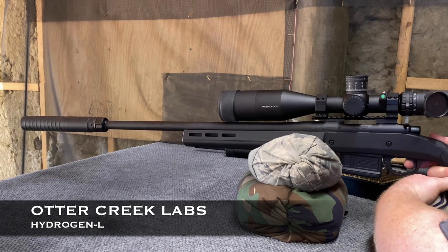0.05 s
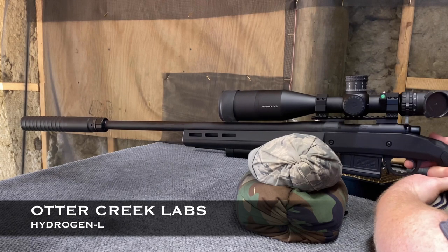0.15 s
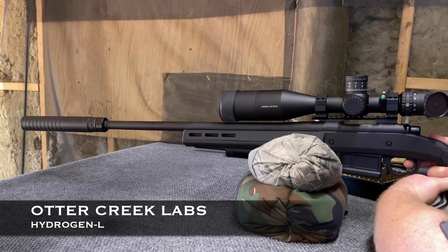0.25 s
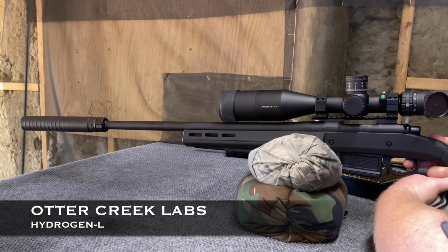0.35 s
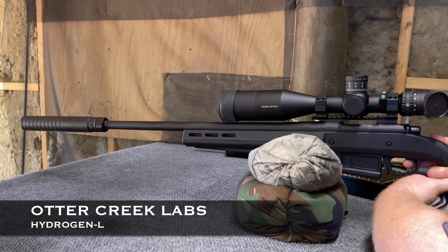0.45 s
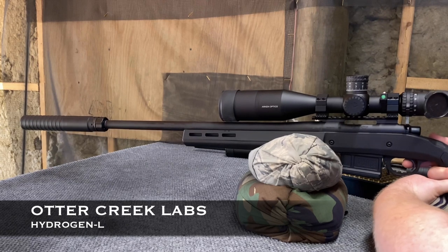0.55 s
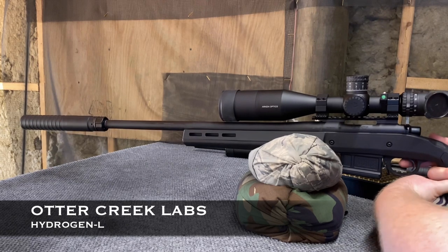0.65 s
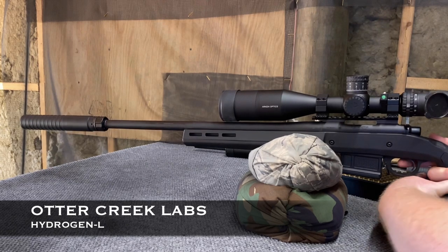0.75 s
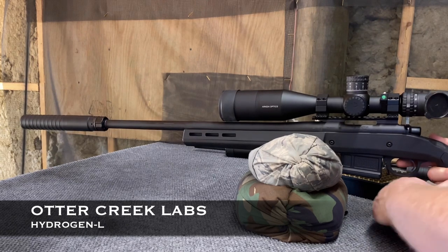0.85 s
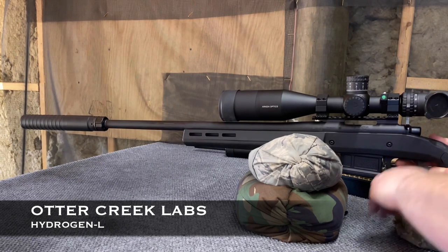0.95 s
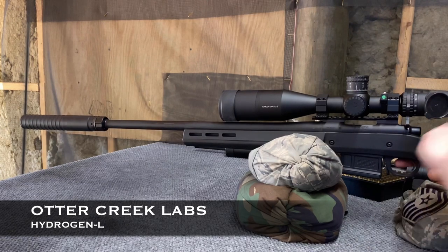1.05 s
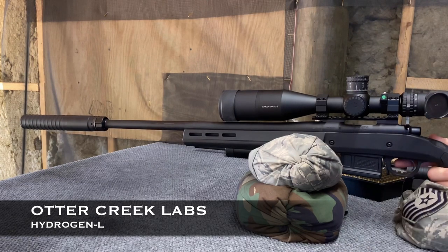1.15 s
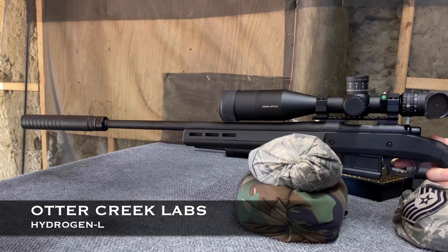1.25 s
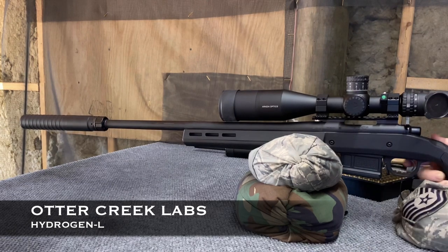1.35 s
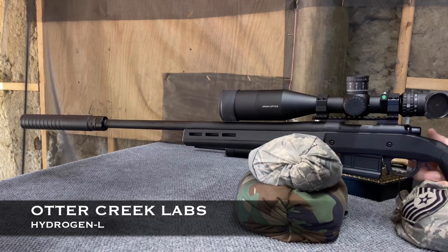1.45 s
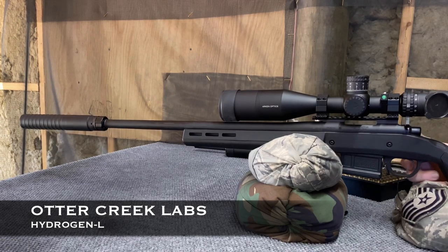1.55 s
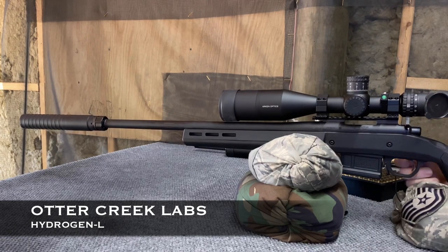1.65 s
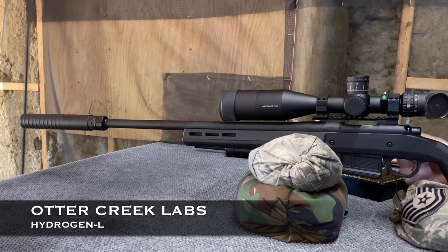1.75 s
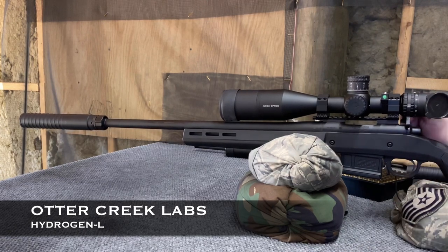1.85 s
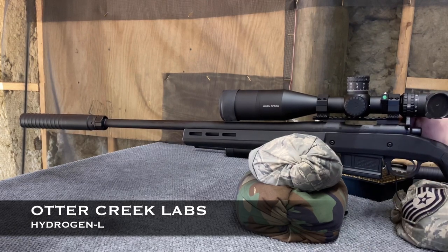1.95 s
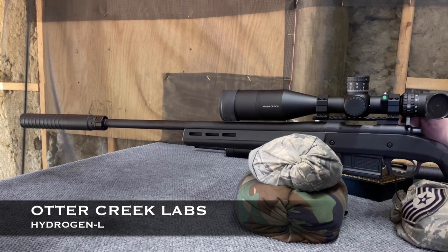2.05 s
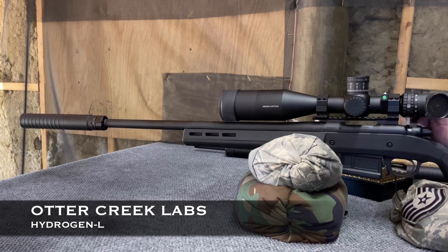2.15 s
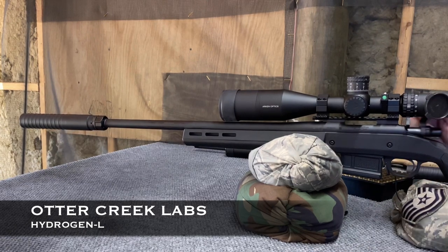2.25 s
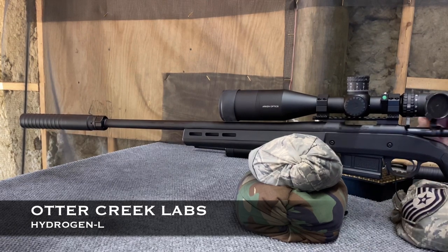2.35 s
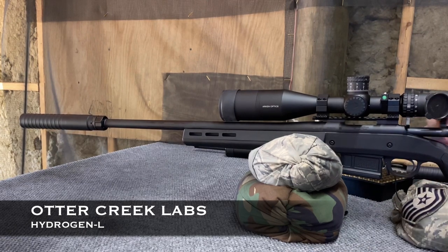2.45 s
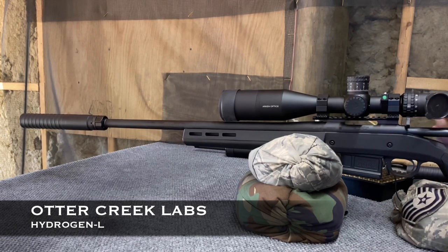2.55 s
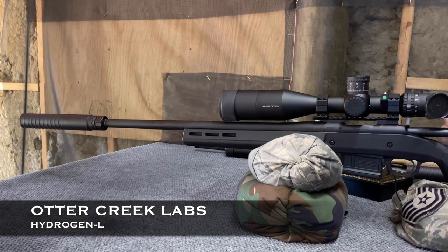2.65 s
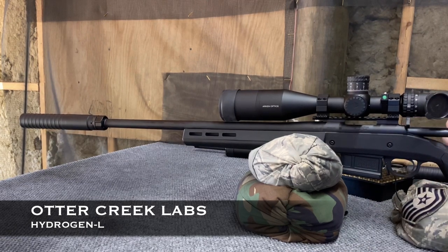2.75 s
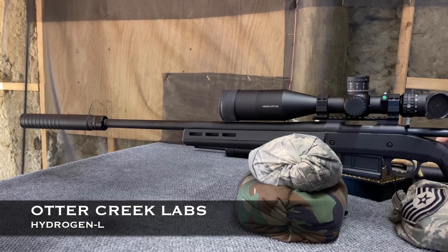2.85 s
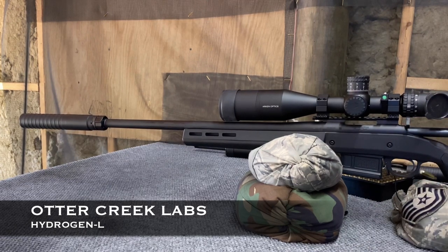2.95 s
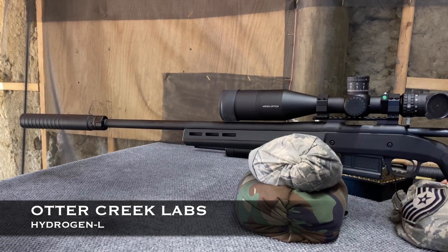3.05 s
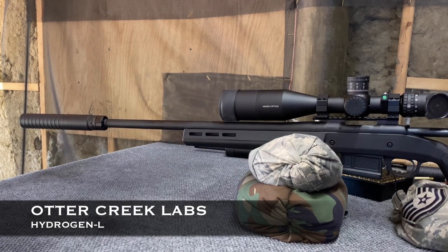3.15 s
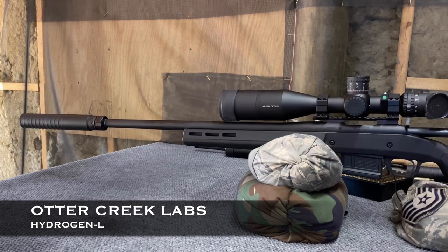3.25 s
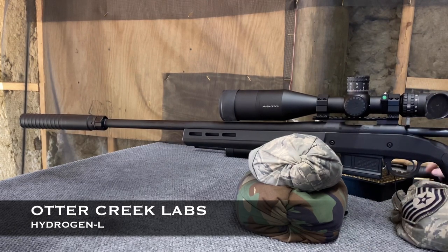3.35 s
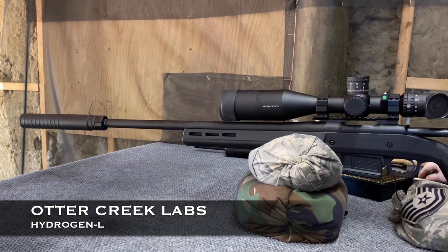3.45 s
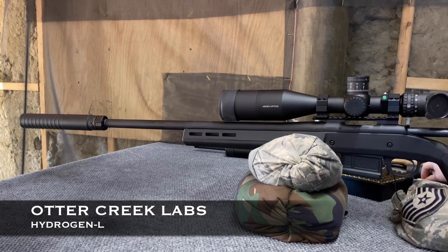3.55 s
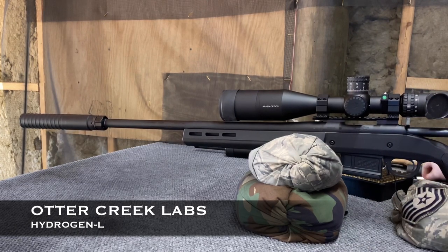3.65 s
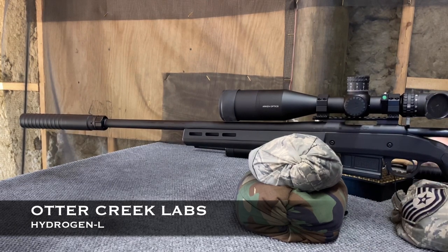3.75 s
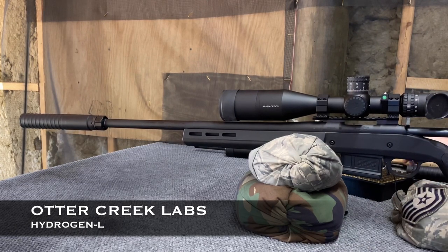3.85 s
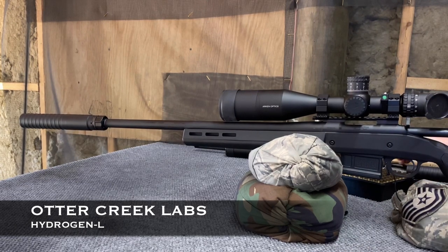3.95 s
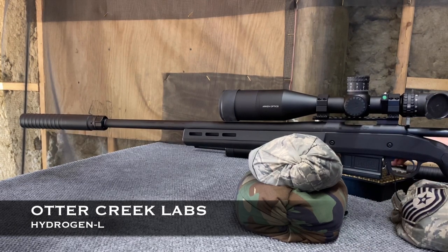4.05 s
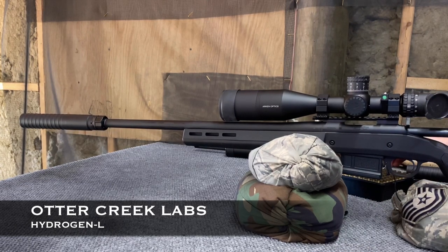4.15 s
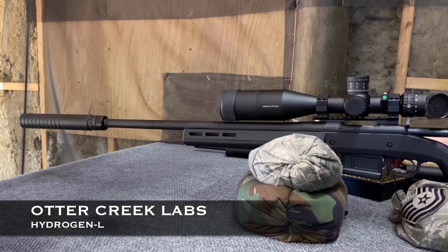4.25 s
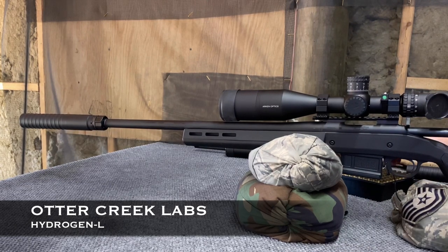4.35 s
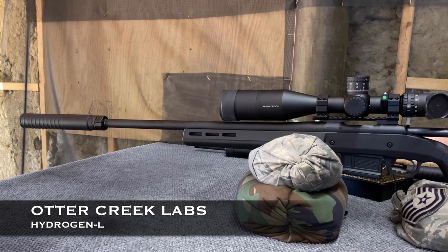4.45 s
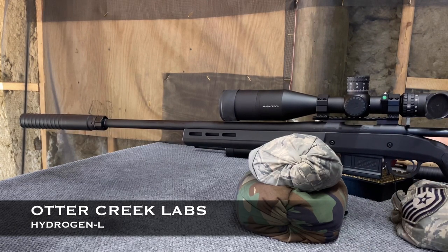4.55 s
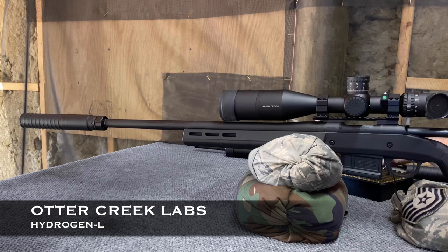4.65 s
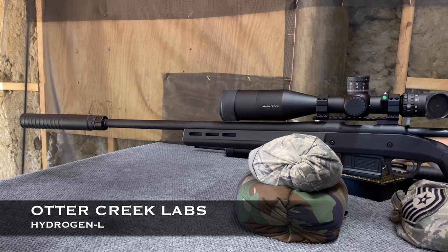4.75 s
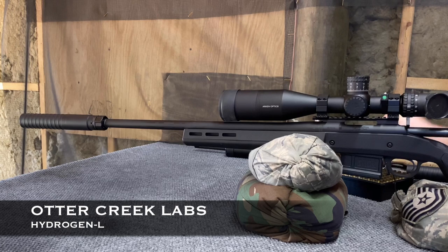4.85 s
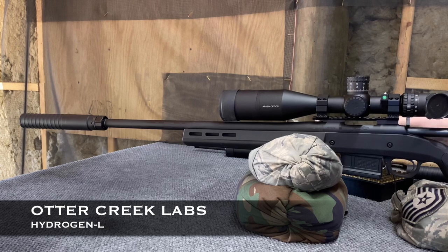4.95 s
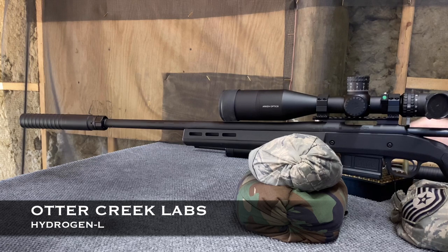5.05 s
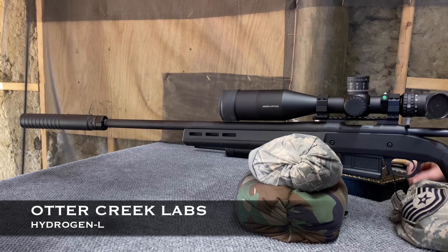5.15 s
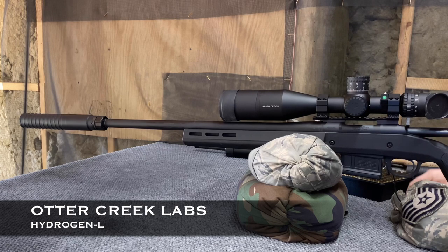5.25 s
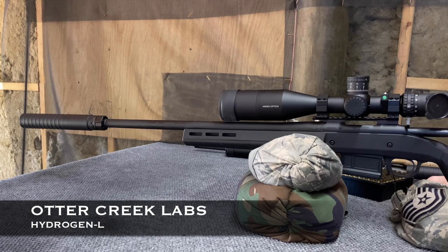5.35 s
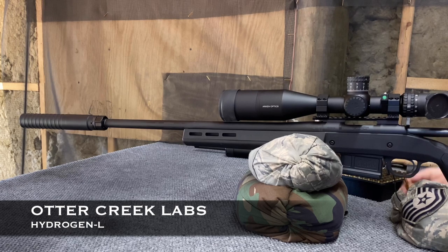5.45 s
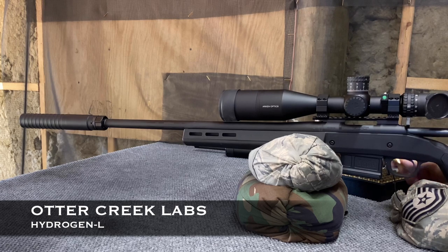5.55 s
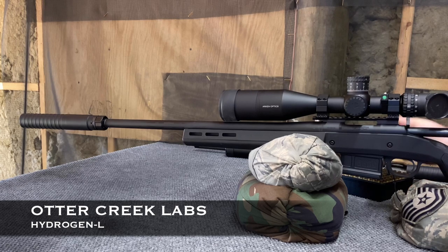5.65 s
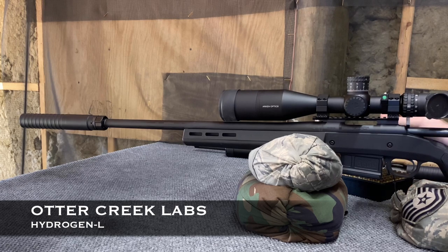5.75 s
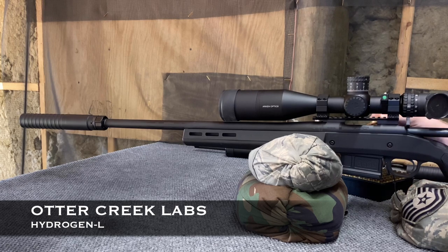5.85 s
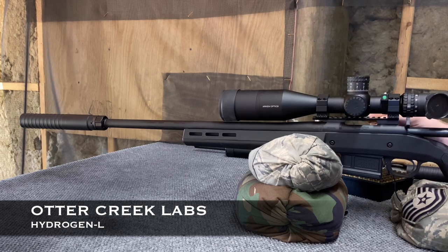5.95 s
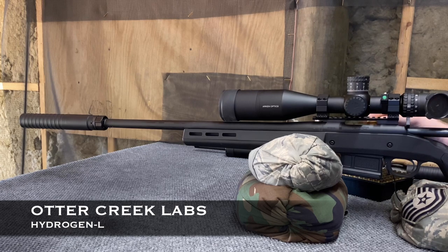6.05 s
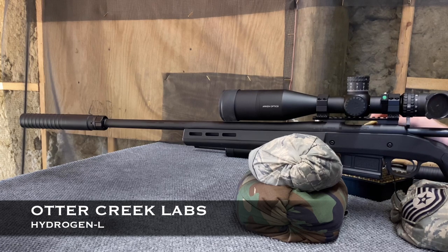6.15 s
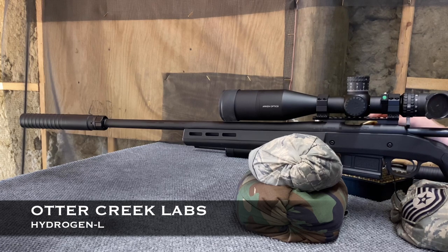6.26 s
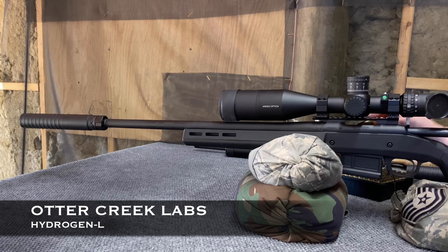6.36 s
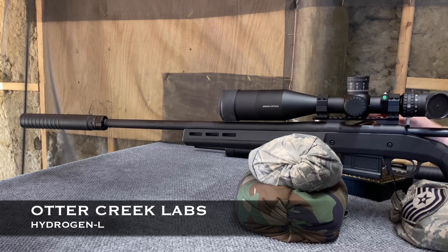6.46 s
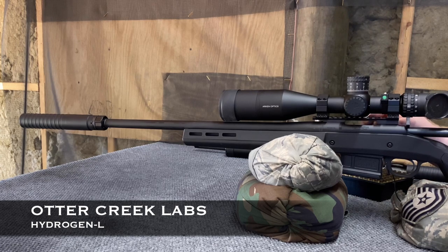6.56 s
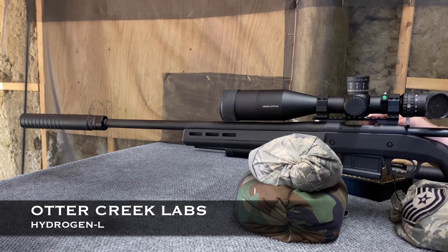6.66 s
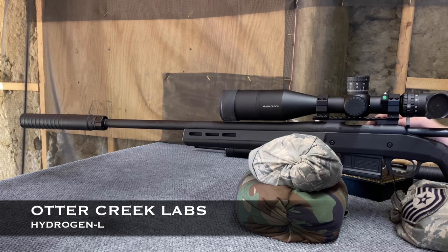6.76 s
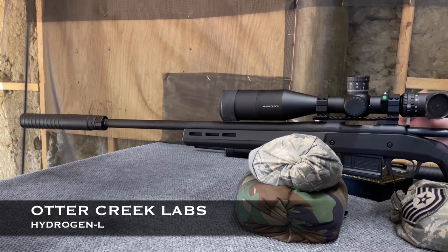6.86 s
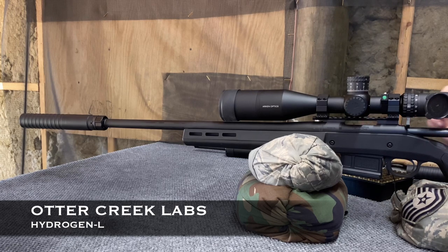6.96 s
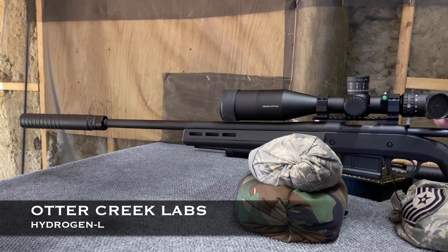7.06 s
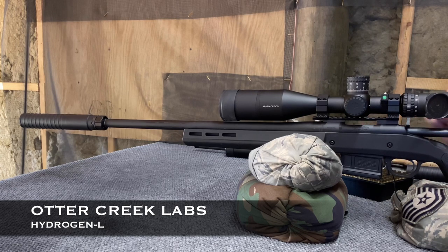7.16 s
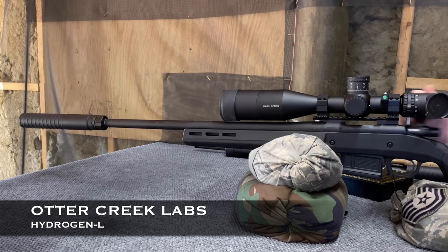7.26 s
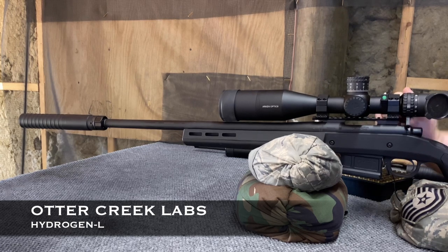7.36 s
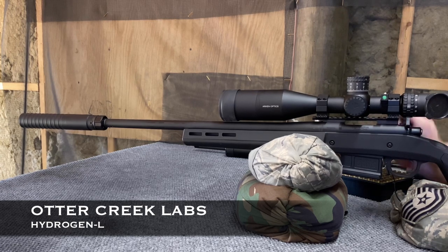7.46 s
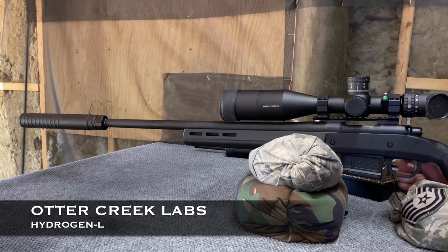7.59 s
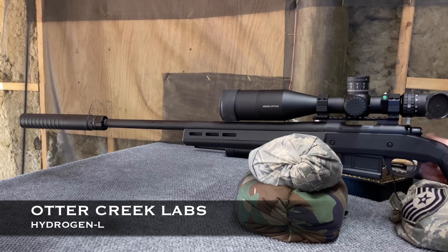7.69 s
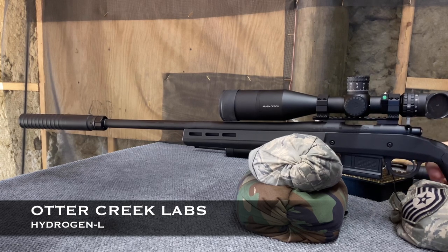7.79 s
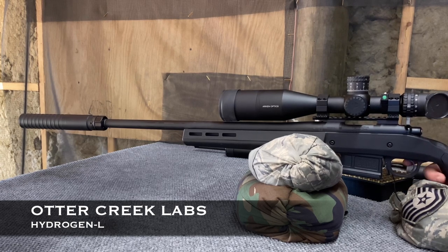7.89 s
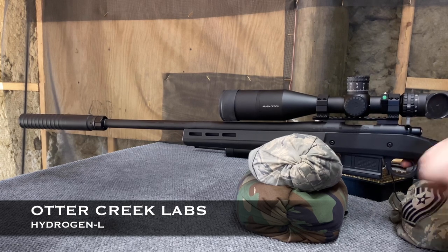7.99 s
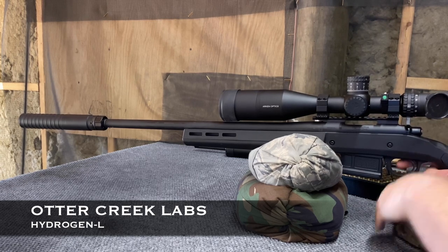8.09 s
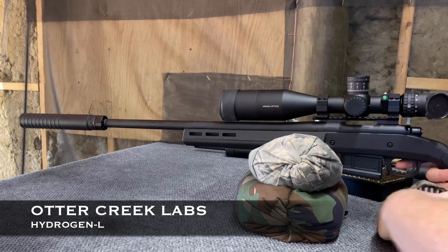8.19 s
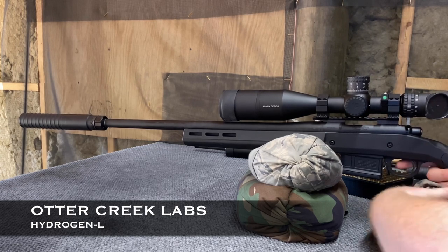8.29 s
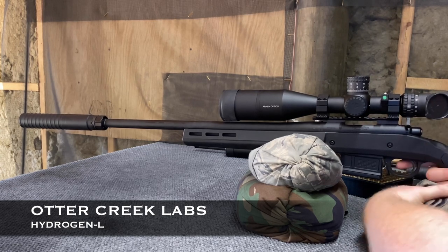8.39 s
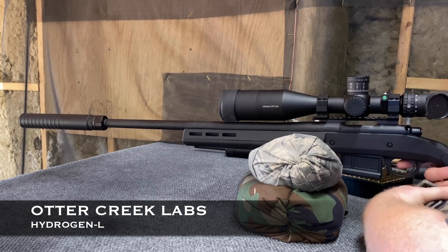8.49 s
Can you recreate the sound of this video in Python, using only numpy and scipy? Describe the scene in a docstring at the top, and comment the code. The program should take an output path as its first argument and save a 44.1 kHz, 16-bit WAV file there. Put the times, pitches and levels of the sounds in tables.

```python
"""A rifle bolt is lifted, drawn back and pushed home on a padded bench in a wooden shooting shed: short
bursts of noise ring the rifle's modes, dense grains make it rub, and dying sines make the bench thud.
The empty brass case is thrown out and rings on the floor, and a new round rattles into place, as dying sines.
Sleeves rustle as shaped noise. The echo of a shot dies away over a far hum and rumble, all filtered noise."""
import sys
import numpy as np
from scipy import signal
from scipy.fft import rfft, irfft
from scipy.io import wavfile

SR = 44100
rng = np.random.default_rng(int(sys.argv[2]) if len(sys.argv) > 2 else 0)


def ratio_of_db(decibels):
    """Turn decibels (scalar or array-like) into linear amplitude factors; 0 dB maps to 1."""
    return 10 ** (np.asarray(decibels, float) / 20)


def wav_out(sig):
    """Save sig, one row per channel (or a flat mono array), as 16-bit PCM at SR to the path in sys.argv[1]."""
    wavfile.write(sys.argv[1], SR, np.round(np.clip(np.atleast_2d(sig).T, -1, 1) * 32767).astype(np.int16))


N = 375985   # length in samples
SPAN = 8192   # samples in a short sound

# Blows on the rifle. Each row: start in seconds, stock knock in dB, knock centre in Hz, steel click in dB,
# edge tick in dB.
BLOWS = [(1.667, -42.5, 1640, -48, -61), (1.742, -45.5, 1678, -47, -63),
         (1.7566, -35.5, 1820, -34.5, -37.5), (1.765, -31.5, 1400, -22, -32),
         (1.9886, -39, 1460, -33.5, -35.5), (2.2134, -61, 1030, -56, -78.5),
         (2.262, -33.5, 1880, -28, -40.5), (2.2839, -37, 2090, -25.5, -29), (2.4261, -42, 1700, -33.5, -50),
         (2.446, -52.5, 1780, -43, -77), (2.472, -42.5, 1900, -34, -51), (2.5858, -35.5, 1210, -32, -31.5),
         (2.6132, -57, 1100, -52, -68.5), (2.6663, -14, 1800, -27, -39), (2.6718, -17.5, 1890, -36, -38.5),
         (2.6998, -27, 1430, -44.5, -51), (2.9502, -46, 1232, -54.5, -66), (4.1419, -41.5, 1633, -65, -70),
         (4.1561, -49, 1340, -59, -79.5), (4.1835, -40.5, 1440, -52, -66),
         (4.1967, -43.5, 1470, -67, -64.5), (4.2277, -42, 1750, -72, -68),
         (4.2706, -45.5, 1520, -66.5, -90), (4.3325, -51, 1550, -76, -84), (4.3763, -45, 1616, -60.5, -70),
         (4.5246, -57, 1607, -84, -91), (4.5525, -48.5, 1820, -72, -84), (4.5689, -53.5, 1640, -76.5, -83),
         (4.7104, -51.5, 1660, -62.5, -70), (4.7348, -16, 1674, -31.5, -42),
         (4.7584, -38.5, 1440, -53.5, -53.5), (4.8329, -56, 1175, -66, -75), (5.1126, -53, 774, -79, -86),
         (6.023, -48.5, 2170, -36, -40.5), (6.0574, -56, 2060, -42.5, -48.5),
         (6.077, -58.5, 1780, -47.5, -55), (6.0886, -62, 1620, -55.5, -63),
         (6.2985, -50.5, 1920, -46.5, -87.5), (6.4681, -23, 800, -26, -51), (6.4782, -37, 860, -42, -43.5),
         (6.4932, -37, 905, -41, -74.5), (6.5183, -51, 1085, -44.5, -54), (6.5311, -59, 990, -52, -62),
         (7.0593, -57, 1785, -53.5, -82), (7.0688, -53, 1810, -46, -64), (7.0878, -50.5, 1580, -49, -70),
         (7.1049, -58, 1950, -35.5, -31), (7.121, -57, 1640, -34.5, -43), (7.1452, -41, 1860, -31, -42),
         (7.153, -44, 2060, -46, -36.5), (7.1717, -28.5, 2230, -22.5, -32.5), (7.1823, -31, 1860, -38, -37),
         (7.1966, -52, 2030, -34, -47), (7.2151, -48, 1796, -37, -42), (7.2295, -24, 1733, -12.5, -15.5),
         (7.3437, -50.5, 1400, -49.5, -66), (7.374, -46, 2270, -27.5, -30.5),
         (7.445, -23, 1454, -20.5, -33.5)]
# The three pitch ranges of knock, click and tick. Each row: lowest Hz, highest Hz.
REGISTERS_HZ = [(600, 2700), (2500, 7300), (7200, 15300)]
# Modes of the rifle's stock and steel. Each row: pitch in Hz, relative level in dB.
RIFLE_MODES = [(668, -4), (790, 2.5), (960, 2.5), (1080, -1), (1215, 2.5), (1350, -6.5), (1625, -14.5),
               (1720, -4.5), (1850, -2), (1935, -4.5), (2062, 1.5), (2210, 5), (2455, -3.5), (2690, -4.5),
               (2960, 1.5), (3220, -1.5), (3380, -1), (3640, -4.5), (3900, -3.5), (4500, -0.5),
               (5040, -3.5), (5600, 1), (6128, -2), (6800, -6.5), (7700, -5.5), (9050, -5.5), (9870, 6),
               (11200, 5)]
# Broad snap of the contact against the modes: one level in dB per register.
CRACK_DB = [-4, -1.5, 7]
# Left minus right: one value in dB per register.
REGISTER_PAN_DB = [-2, 2.6, .5]
# The bolt body sings once as it slams home. Each row: pitch in Hz, level in dB, time to fall 60 dB in seconds.
BOLT_RING = [(6128, -34, .19), (10500, -50, .2)]
# Parts rubbing as bolt and magazine are handled. Each row: peak in seconds, rise in seconds, fall in seconds,
# steel in dB, stock in dB. Here and in all strokes below, rise and fall are the times for 20 dB.
SLIDES = [(2.05, .3, .3, -73.5, -66), (2.334, 0.32, .25, -65, -63), (2.64, .3, .05, -73.5, -63.5),
          (4.2, 0.068, .1, -72.5, -55), (4.28, 0.069, .1, -79, -66), (4.36, 0.044, .1, -79.5, -58.5),
          (4.55, .09, .1, -82, -61.5), (4.67, .03, .05, -81.5, -61), (4.72, .1, .03, -72.5, -59),
          (6.545, 0.038, .05, -59, -54.5), (7.13, 0.044, 0.091, -54.5, -51.5), (7.24, .01, .09, -63, -46.5),
          (7.45, 0.21, .1, -70.5, -56.5)]
# Rubbing as the bolt is pushed home, a curve. Each row: time in seconds, steel in dB, stock in dB.
PUSH_HOME = [(7.04, -80.5, -67.5), (7.106, -54, -57.5), (7.158, -40.5, -45), (7.172, -23, -40.5),
             (7.216, -47.5, -53.5), (7.228, -27.5, -22)]
# Blows heavy enough to move the bench top. Each row: start in seconds, level (rms) in dB, centre in Hz.
THUDS = [(1.767, -48, 230), (2.262, -50.5, 300), (2.586, -51, 300), (2.665, -35, 339), (2.699, -52.5, 340),
         (4.735, -39, 370), (4.757, -48.5, 370), (5.112, -26.5, 290), (6.47, -54, 199.4), (7.17, -50, 300),
         (7.227, -45.5, 261), (7.443, -39, 256)]
# Modes of the bench planks. Each row: pitch in Hz, relative level in dB, time to fall 60 dB in seconds.
BENCH_MODES = [(168, -2, 0.074), (228, -8, 0.099), (300, -1, 0.082), (341.4, -6, 0.12), (398, 1.5, 0.063),
               (512, -10, 0.07)]
# Low, middle and high ring of brass: the low ring is the new round's, the middle and high rings are the held
# case's. Each row of a ring: pitch in Hz, relative level in dB.
BRASS_RINGS = [
    [(5360, 0), (5500, -8.5)],
    [(10820, 5), (10300, -14.5)],
    [(14350, -2), (14590, -2.5), (14680, -1), (14940, -5)],
]
# Knocks on the fired case while the bolt holds it. Each row: start in seconds, middle ring in dB,
# high ring in dB, time to fall 60 dB in seconds.
CASE_TAPS = [(2.262, -29.5, -34, .085), (2.284, -8.5, -29, 0.02), (2.427, -43, -44, 0.079),
             (2.473, -61.5, -30, .12), (2.667, -31, -35, .23), (4.156, -90, -49.5, .13)]
# Knocks on the new round, which sings on the low ring only. Each row: start in seconds, level in dB.
ROUND_TAPS = [(4.087, -50.5), (4.142, -51), (4.228, -48), (6.024, -25), (6.057, -36.5), (6.3, -43.5),
              (6.352, -58.5), (6.471, -40.5), (6.519, -42.5), (6.543, -44), (7.106, -23)]
# Modes of the freed case. Each row: pitch in Hz, relative level in dB, time to fall 60 dB in seconds.
FREE_CASE = [(4560, -25, 0.11), (8791, -13, 0.51), (9889, -40, 0.52), (10270, 0, 0.47), (10540, -21, 0.095),
             (10790, -17, 0.074), (11120, -18, 0.29), (11500, -22, 0.16), (12840, -30, 0.14),
             (12980, -42, 0.53), (14380, -24, 0.11), (15230, -13, 0.071)]
# A sleeve brushes the bench cloth lightly. Each row: peak, rise and fall in seconds, level in dB.
BRUSHES = [(.65, .2, .3, -75.5), (.81, 0.11, .4, -72.5), (1.27, 0.46, .5, -82), (1.56, 0.31, .3, -75.5)]
# An arm drags over the bench pad. Each row: peak, rise and fall in seconds, sleeve in dB, elbow in dB.
DRAGS = [(7.61, .05, 0.19, -73, -70), (7.73, 0.091, 0.32, -59, -52.5), (7.86, 0.24, 0.15, -58.5, -55),
         (7.96, 0.024, 0.054, -71.5, -62), (8.11, 0.095, 0.2, -60, -49.5), (8.24, 0.05, 0.24, -67, -62.5),
         (8.45, 0.27, 0.45, -70, -61)]
# Colours of the brushing and the dragging sleeve. Each row of either: pitch in Hz, relative dB per Hz.
CLOTHS = [
    [(2060, -32.5), (3500, -2.5), (8360, -4), (10100, -1.5), (12200, -15), (12900, -5), (14300, -5.5),
     (16000, -21.5)],
    [(1650, -29.5), (2800, 5), (4530, -0.5), (7940, -11.5), (10100, -11), (11400, -14.5), (12200, -28),
     (14200, -11), (16000, -29.5)],
]
# Colour of the elbow on the pad. Each row: pitch in Hz, relative dB per Hz.
PAD = [(590, -38.5), (1000, -1.5), (1280, 1), (1720, -2), (1880, 2), (2310, -12.5), (3000, -13),
       (3900, -40.5), (6600, -120)]
# Colour of the shot's echo. Each row: pitch in Hz, relative dB per Hz.
VALLEY = [(59, -34), (100, -13), (282, 4.5), (403, -16.5), (544, 5.5), (1160, -9), (2030, 5.5),
          (3450, -17.5), (5000, -40), (5520, -44), (9000, -54), (11700, -76), (19800, -120)]
# A far wash, coloured like the echo, swells and fades. Each row: peak, rise and fall in seconds, level in dB.
WASHES = [(1.9, 0.2, 1.2, -64), (6.6, .3, 0.67, -61.5)]
# Rumble from outdoors and through the bench, a curve. Each row: time in seconds, level in dB.
RUMBLE_LEVEL = [(0.0, -59.5), (0.76, -65), (1.16, -71.5), (1.57, -62.5), (1.85, -51), (2.25, -59.5),
                (2.73, -55), (3.46, -66), (3.85, -67.5), (4.23, -60), (4.54, -66.5), (5.03, -63),
                (5.53, -66.5), (6.86, -64.5), (7.22, -63), (7.43, -49.5), (7.74, -55), (8.53, -53)]
# Colour of the rumble. Each row: pitch in Hz, relative dB per Hz.
RUMBLE = [(15, -47), (25, -18), (84, -1), (113, 2), (155, -5.5), (206, -13), (260, -10.5), (340, -38),
          (570, -120)]
# Colour of the hush. Each row: pitch in Hz, relative dB per Hz.
HUSH = [(120, -35.5), (200, -11), (236, -11), (273, -24.5), (347, -6.5), (440, -9), (529, 6), (579, -2),
        (1080, -15), (1350, -13), (2650, -39.5), (6400, -37), (16000, -64)]
# Far hums. Each row: pitch in Hz, width in Hz, level in dB, left minus right in dB.
HUMS = [(105, 5, -67, -4), (540, 5, -67.5, 3), (1370, 220, -73, -3)]
# How alike left and right noise are. Each row: pitch in Hz, likeness from 0 (unrelated) to 1 (the same).
LIKENESS = [(60, 0.77), (180, .5), (600, 0.52), (1650, 0), (4970, .1), (15000, 0.0)]

# Fall (20 dB) of contact noise in a blow of 0 dB; gentler blows touch longer, and so do those with more
# stock than steel.
HARD_CONTACT_MS, SOFTER_MS_PER_DB, DULLER_MS_PER_DB = 1.5, 0.1578, 0.1167
KNOCK_SHARPNESS = 1.2   # Q of each of the two resonances
LONGEST_T60_S, RING_CYCLES = .032, 50   # plastic and padding damp every rifle mode quickly
BOLT_HOME_S = 7.2305
ROUND_T60_S = 0.064
LANDING_S, LANDING_DB = 2.9495, -24.5   # the freed case on the floor
CASE_SPLIT_HZ, CASE_TWIN_DB = 6.96, -20   # each mode's twin: pitch above it, level against it
CLOTH_PATCHY_DB = 1.1
SHED_T60_S, SHED_DB, WALL_CUT_HZ = .17, -21.5, 4500
ECHO_DB, ECHO_DB_PER_S = -42.5, 29   # level at the start, rate of fall
HUSH_DB, HUSH_FOLLOWS = -62.5, .45   # level at mean rumble, share of the rumble's swing in dB
RUMBLE_CUT_HZ = 42
PORT_TURN_HZ, PORT_WIDTH_HZ = 610, 350   # where the left port's phase turns
LEFT_DB = -1.07   # left minus right


def blows():
    """Each blow is a chatter of contact noise through the rifle's modes; a centre pitch focuses its knock."""
    s, knock_db, centre_hz, click_db, tick_db = np.transpose(BLOWS)
    contact_ms = HARD_CONTACT_MS - SOFTER_MS_PER_DB * np.maximum(knock_db, click_db)
    contact_ms = contact_ms + DULLER_MS_PER_DB * np.maximum(knock_db - click_db, 0)
    push = contacts(contact_ms, alike=.75)
    knock, click, tick = registers(count=len(s), spread_db=2.5, sides_db=2.5)
    knock = knock * near(np.linspace(1, SR / 2, SPAN + 1), centre_hz)
    sounds = sum(at_level(push * answer, level_db, size=240)
                 for answer, level_db in [(knock, knock_db), (click, click_db), (tick, tick_db)])
    out = np.zeros((2, N))
    for at, sound in zip(s, sounds):
        add(out, at, sound)
    return out


def contacts(contact_ms, alike):
    """Spectra of short bursts of contact chatter, partly shared by both sides."""
    noise = rng.standard_normal((len(contact_ms), 3, SPAN))
    shared, own = noise[:, :1], noise[:, 1:]
    noise = alike * shared + np.sqrt(max(1 - alike ** 2, 0)) * own
    contact_s = np.clip(contact_ms, .5, 60)[:, None, None] / 1000
    t = np.arange(SPAN) / SR / contact_s   # time counted in contacts
    return rfft(noise * ratio_of_db(-20 * t) * (1 - np.exp(-t / .16)), 2 * SPAN)


def registers(count, spread_db, sides_db):
    """Spectra of the rifle's answer to a click, per register: every touch weighs the modes anew."""
    hz = np.array(RIFLE_MODES)[:, 0]
    t60 = np.minimum(LONGEST_T60_S, RING_CYCLES / hz)
    rings = rfft(ringing(np.column_stack([RIFLE_MODES, t60]), size=SPAN), 2 * SPAN)
    luck = rng.standard_normal((count, 3, len(RIFLE_MODES)))
    weights = ratio_of_db(spread_db * luck[:, :1] + sides_db * luck[:, 1:])
    click = np.eye(1, SPAN)[0]   # a single sample
    for (low, high), crack_db, pan_db in zip(REGISTERS_HZ, CRACK_DB, REGISTER_PAN_DB):
        own = (hz >= low) & (hz < high)   # neighbouring registers overlap a little
        band_filter = signal.butter(6, [low, high], "band", fs=SR, output="sos")
        band = rfft(signal.sosfilt(band_filter, click), 2 * SPAN)
        modes = weights[..., own] @ rings[own]
        modes = modes / np.sqrt(np.mean(abs(modes) ** 2) * SR / 2 / (high - low))
        yield (modes + ratio_of_db(crack_db)) * band * pan(pan_db)


def near(hz, centre_hz):
    """A broad resonance, applied twice, around a blow's centre pitch."""
    ratio = hz / centre_hz[:, None, None]
    return 1 / (1 + 1j * KNOCK_SHARPNESS * (ratio - 1 / ratio)) ** 2


def bolt_ring():
    """The long steel body of the bolt keeps sounding after the slam, as dying sines."""
    out = np.zeros(N)
    add(out, BOLT_HOME_S, ringing(BOLT_RING, size=2 * SPAN).sum(0))
    return out


def slide(grains_per_s=2500, rough_db=2.5):
    """Rubbing is a dense rain of uneven grains and noise into the steel's and the stock's modes."""
    hits = rng.random(N) < grains_per_s / SR
    grains = hits * ratio_of_db(rough_db * rng.exponential(1, N)) * rng.choice([-1, 1], N)
    rub = (grains + .25 * rng.standard_normal((2, N))) * ratio_of_db(3.0 * drift(40))
    knock, click, tick = registers(count=1, spread_db=1.5, sides_db=2.5)
    steel_gain, stock_gain = strokes(SLIDES) + ratio_of_db(np.array(in_time(PUSH_HOME)))
    steel_answer = click[0] + ratio_of_db(-20.5) * tick[0]
    out = 0
    for gain, answer in [(steel_gain, steel_answer), (stock_gain, knock[0])]:
        rubbed = signal.fftconvolve(rub, irfft(answer)[:, :SPAN], axes=1)[:, :N]
        out = out + gain * rms_one(rubbed)
    return out


def thuds(swell_s=0.0047):
    """A soft push sets the bench planks going, most those near its centre pitch; they swell before they die."""
    s, level_db, centre_hz = np.transpose(THUDS)
    octaves = np.log2(np.array(BENCH_MODES)[:, 0] / centre_hz[:, None, None])
    weights = ratio_of_db(2.5 * rng.standard_normal(octaves.shape) - 5 * octaves ** 2)
    swell = (1 - np.exp(-np.arange(SPAN) / SR / swell_s)) ** 2
    sounds = weights @ ringing(BENCH_MODES, size=SPAN) * swell
    sounds = signal.sosfilt(signal.butter(2, 650, fs=SR, output="sos"), sounds)
    out = np.zeros((1, N))
    for at, sound in zip(s, at_level(rfft(sounds), level_db, size=900)):
        add(out, at, sound)
    return out


def brass():
    """The thin case wall sings while held, and longer once it lands free, when its modes come in close pairs."""
    out = np.zeros(N)
    rise = 1 - np.exp(-np.arange(4 * SPAN) / SR / .0008)
    taps = [(s, BRASS_RINGS[:1], [level_db], ROUND_T60_S) for s, level_db in ROUND_TAPS]
    taps += [(s, BRASS_RINGS[1:], levels_db, t60) for s, *levels_db, t60 in CASE_TAPS]
    for s, rings, levels_db, t60 in taps:
        modes = [(hz, db + level_db, t60) for ring, level_db in zip(rings, levels_db) for hz, db in ring]
        add(out, s, ringing(modes, size=SPAN).sum(0) * rise[:SPAN])
    twins = np.array(FREE_CASE) + [CASE_SPLIT_HZ, CASE_TWIN_DB, 0]
    landing = ringing(np.vstack([FREE_CASE, twins]), size=4 * SPAN).sum(0)
    add(out, LANDING_S, ratio_of_db(LANDING_DB) * rise * landing)
    return out * pan(-2.0)


def shed(x):
    """Plank walls close by: a short dull tail, different at each side."""
    t = np.arange(2 * SPAN) / SR
    tail = rng.standard_normal((2, len(t))) * ratio_of_db(-60 * t / SHED_T60_S) * (1 - np.exp(-t / 0.006))
    tail = signal.sosfilt(signal.butter(1, WALL_CUT_HZ, fs=SR, output="sos"), tail)
    return ratio_of_db(SHED_DB) * signal.fftconvolve(x, tail / np.linalg.norm(tail[0]), axes=1)[:, :N]


def rustle():
    """Sleeves brush and drag and an elbow rubs the pad: patchy coloured noise that swells and fades."""
    brush, = strokes(BRUSHES)
    sleeve, elbow = strokes(DRAGS)
    return sum(gain * banded_noise(colour, patchy_db=CLOTH_PATCHY_DB)
               for gain, colour in [(brush, CLOTHS[0]), (sleeve, CLOTHS[1]), (elbow, PAD)])


def echo():
    """The shot's echo is smooth far noise dying at a steady rate, with washes of the same colour."""
    t = np.arange(N) / SR
    gain = ratio_of_db(ECHO_DB - ECHO_DB_PER_S * t) + strokes(WASHES)[0]
    return gain * banded_noise(VALLEY, patchy_db=.3)


def outdoors():
    """Rumble and hush are coloured noise; far hums are noise in bands so narrow that they waver."""
    rumble_db, = in_time(RUMBLE_LEVEL)
    hush_db = HUSH_DB + HUSH_FOLLOWS * (rumble_db - rumble_db.mean())
    out = ratio_of_db(rumble_db) * banded_noise(RUMBLE, patchy_db=0.0)
    out = out + ratio_of_db(hush_db) * banded_noise(HUSH, patchy_db=2.4)
    for hz, width_hz, level_db, pan_db in HUMS:
        narrow = signal.butter(1, [hz - width_hz / 2, hz + width_hz / 2], "band", fs=SR, output="sos")
        hum = rms_one(signal.sosfilt(narrow, rng.standard_normal(N)))
        out += ratio_of_db(level_db) * pan(pan_db) * hum
    return out


def banded_noise(spectrum, patchy_db):
    """Half-octave bands of stereo noise, each with its own level, flicker and likeness; rms 1."""
    out, together = 0, drift(6)
    edges = 24 * 2 ** np.arange(0, 9.6, .5)
    white = rng.standard_normal((2, 2, N))   # neighbouring bands take turns
    for k, (low, high) in enumerate(zip(edges, edges[1:])):
        hz = np.sqrt(low * high)
        if not spectrum[0][0] / 1.5 < hz < spectrum[-1][0] * 1.5:
            continue
        band_filter = signal.butter(3, [low, high], "band", fs=SR, output="sos")
        mid, side = signal.sosfilt(band_filter, white[k % 2])
        alike = np.clip(at_hz(LIKENESS, hz), -1, 1)
        gain = ratio_of_db(at_hz(spectrum, hz) + patchy_db * (together + drift(36)))
        out = out + gain * (np.sqrt(1 + alike) * mid + np.sqrt(1 - alike) * side * [[1], [-1]])
    return rms_one(out)


def drift(rate):
    """Slow chance, spread 1, made at a fortieth of the sample rate; rate in Hz."""
    r = np.exp(-80 * np.pi * rate / SR)
    slow = signal.lfilter([1], [1, -2 * r, r * r], rng.standard_normal(N // 40 + 2002))[2000:]
    return np.interp(np.arange(N) / 40, np.arange(len(slow)), rms_one(slow))


def strokes(rows):
    """Gain of each level column: every row rises to its peak and falls at a steady rate in dB."""
    t = np.arange(0, N + 32, 32) / SR
    peak_s, rise_s, fall_s, *levels_db = np.transpose(rows)[:, :, None]
    rising = (peak_s - t) / np.maximum(rise_s, .005)
    falling = (t - peak_s) / np.maximum(fall_s, .005)
    shape_db = -20 * np.maximum(rising, falling)
    return np.array([np.interp(np.arange(N) / SR, t, ratio_of_db(level_db + shape_db).sum(0)) for level_db in levels_db])


def in_time(rows):
    """Columns of a curve, sample by sample; -120 outside it."""
    s, *columns = np.transpose(rows)
    return [np.interp(np.arange(N) / SR, s, c, left=-120, right=-120) for c in columns]


def at_hz(points, hz):
    """Reads a curve over pitch on a log axis."""
    return np.interp(np.log(hz), np.log(np.array(points)[:, 0]), np.array(points)[:, 1])


def ringing(modes, size):
    """One dying sine per mode."""
    hz, level_db, t60 = np.transpose(modes)[:, :, None]
    t = np.arange(size) / SR
    return ratio_of_db(level_db - 60 * t / t60) * np.sin(2 * np.pi * hz * t)


def at_level(spectra, level_db, size):
    """Sounds whose first samples, size of them, have the given rms."""
    part = irfft(spectra)[..., :SPAN]
    rms = np.sqrt(np.mean(part[..., :size] ** 2, axis=(1, 2), keepdims=True))
    return part / rms * ratio_of_db(level_db[:, None, None])


def rms_one(x):
    """Scales to rms 1."""
    return x / np.sqrt(np.mean(x ** 2) + 1e-20)


def pan(left_minus_right_db):
    """Gains of left and right."""
    return ratio_of_db(left_minus_right_db / 2 * np.array([[1], [-1]]))


def add(out, s, sound):
    """Lays a sound in at time s."""
    at = round(s * SR)
    out[..., at:at + sound.shape[-1]] += sound[..., :N - at]


def scene():
    """Rifle and brass in the shed, cloth beside them, the range beyond."""
    rifle = blows() + bolt_ring() + slide() + thuds() + brass()
    return rifle + shed(rifle) + rustle() + echo() + outdoors()


def top_cut(x):
    """Nothing passes above the cut-off."""
    return signal.sosfilt(signal.butter(12, 16650, fs=SR, output="sos"), x)


def record(dry):
    """The left port hears a little later and softer, its phase turned through the low mids."""
    dry = signal.sosfilt(signal.butter(2, RUMBLE_CUT_HZ, "high", fs=SR, output="sos"), dry)
    r, w = np.exp(-np.pi * PORT_WIDTH_HZ / SR), 2 * np.pi * PORT_TURN_HZ / SR
    poles = [1, -2 * r * np.cos(w), r * r]
    turned = signal.lfilter([0] + poles[::-1], poles, dry[0])   # all-pass, and one sample late
    both = np.array([turned, dry[1]]) * pan(LEFT_DB)
    both = np.tanh(both)   # loud peaks are rounded
    treble_cut = signal.cheby2(8, 40, 16500, fs=SR, output="sos")   # 40 dB down from 16500 Hz up
    mix = signal.sosfilt(treble_cut, both)
    return top_cut(mix)


dry = scene()
out = record(dry)
wav_out(out)
```